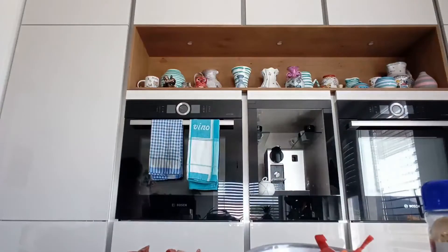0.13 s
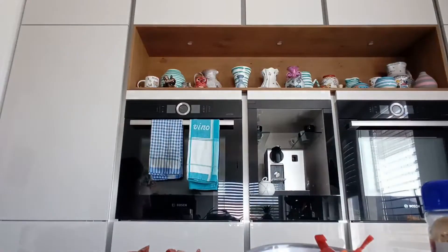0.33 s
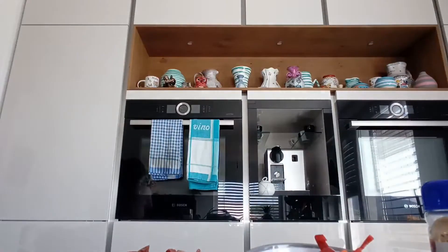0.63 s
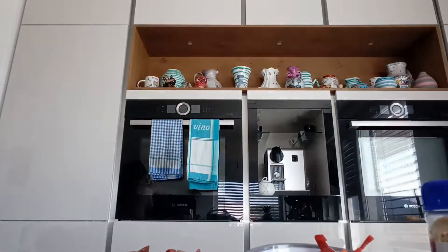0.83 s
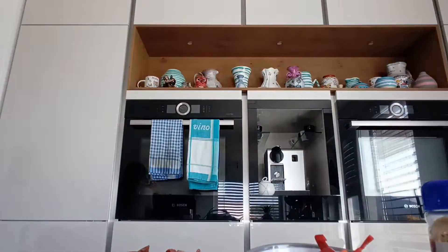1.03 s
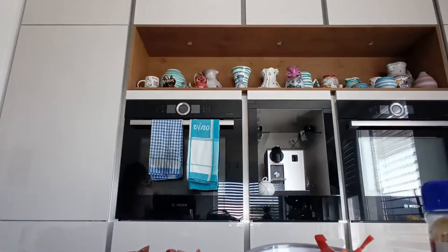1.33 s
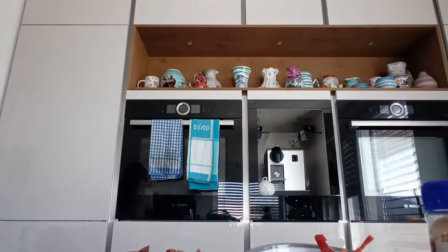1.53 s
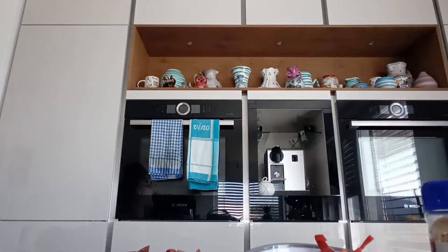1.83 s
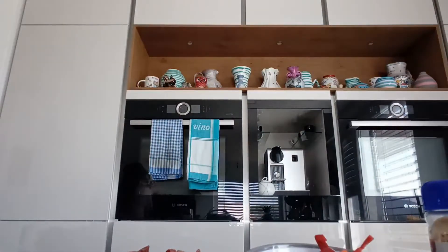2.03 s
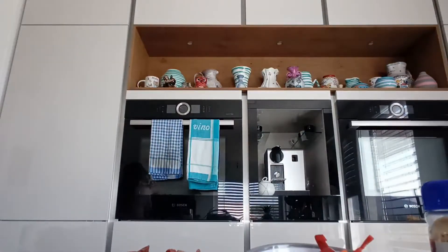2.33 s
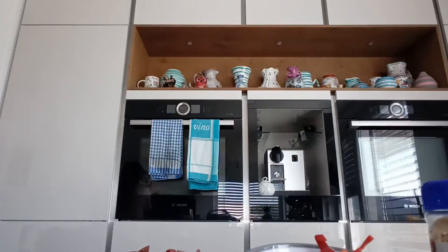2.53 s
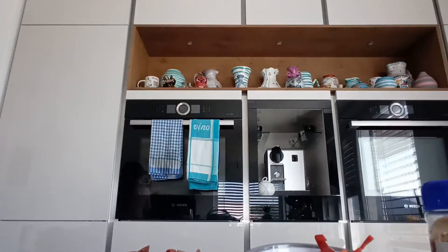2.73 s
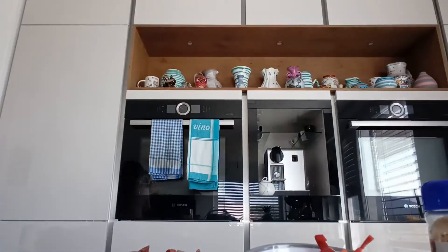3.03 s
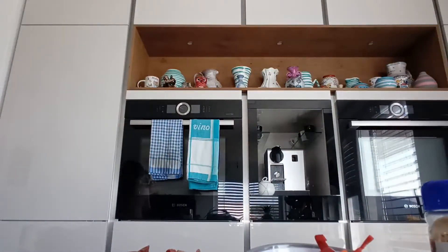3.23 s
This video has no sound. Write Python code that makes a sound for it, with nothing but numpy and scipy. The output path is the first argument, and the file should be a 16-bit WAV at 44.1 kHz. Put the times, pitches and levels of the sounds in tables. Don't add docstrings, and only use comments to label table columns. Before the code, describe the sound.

Running tap sprays into a metal basin, with splashes and low drumming from hands being washed

```python
import sys
import numpy as np
from scipy import signal
from scipy.fft import rfft, irfft, next_fast_len
from scipy.io import wavfile
from scipy.ndimage import uniform_filter1d, map_coordinates

SR = 44100
rng = np.random.default_rng(int(sys.argv[2]) if len(sys.argv) > 2 else 0)


def to_linear_factor(level_db):
    exponent = np.asarray(level_db, float) / 20
    return 10 ** exponent


def unload_wav(signal):
    wavfile.write(
        sys.argv[1],
        SR,
        np.round(np.clip(np.atleast_2d(signal).T, -1, 1) * 32767).astype(np.int16),
    )


N = 149940

# frequency in Hz, level in dB.
ROOM_COLOUR = [(20, -16), (60, -5), (100, -8), (300, -32), (900, -37)]
# start in seconds, length in seconds, pitch in Hz, level in dB.
SINGING_MODES = [(0.086, 0.14, 187, -52.5), (0.287, 0.14, 146, -51), (0.511, 0.11, 170, -46),
                 (0.824, 0.11, 402, -58), (0.895, 0.15, 194, -54.5), (0.98, 0.099, 439, -53),
                 (1.035, 0.036, 146, -44), (1.294, .27, 143, -56), (1.595, .17, 143, -57),
                 (1.883, 0.1, 140, -59.5), (1.883, 0.13, 425, -61), (1.92, 0.17, 348, -65),
                 (2.04, 0.099, 185, -57), (2.13, 0.074, 151, -61), (2.217, 0.024, 575, -53),
                 (2.222, 0.031, 345, -57), (2.216, .06, 439, -58), (2.264, 0.062, 195, -61.5),
                 (2.586, 0.023, 180, -47), (3.144, 0.075, 185, -55), (2.503, 0.14, 189, -58),
                 (2.485, .25, 425, -61), (2.825, 0.02, 165, -59), (2.834, 0.046, 345, -68),
                 (1.333, .08, 1150, -68.5), (1.504, 0.17, 1150, -71), (2.73, .06, 803, -62),
                 (3.028, .05, 350, -63), (3.045, 0.043, 185, -51), (3.148, 0.14, 345, -57.5),
                 (3.173, 0.025, 555, -53), (3.217, 0.15, 530, -64.5)]
# start in seconds, length in seconds, level in dB,
# share landing near the wall in dB.
BASIN_POURS = [(0, 0.027, -43, -5.5), (0.067, 0.27, -43, -11), (0.386, 0.077, -41.5, -13),
               (0.496, 0.12, -40.5, -8.5), (0.647, 0.085, -43, -9.5), (0.785, 0.046, -50.5, -5.5),
               (0.858, 0.17, -50, -4), (1.01, 0.093, -44, -3.5), (1.15, 0.092, -54.5, -9.5),
               (1.287, 0.19, -53.5, -40), (1.596, 0.14, -55, -16), (1.883, 0.14, -58, -2),
               (2.037, 0.14, -49.5, -6.5), (2.215, 0.028, -54.5, 8), (2.28, 0.017, -57.5, -1),
               (2.503, 0.12, -55.5, 2.5), (2.693, 0.082, -78, 7), (2.805, 0.02, -62, -15),
               (2.923, 0.038, -55.5, -20), (2.996, 0.19, -48, -7), (3.224, 0.093, -68.5, 11),
               (3.313, 0.088, -63.5, 2)]
# time in seconds, peak in dB.
BASIN_SLUGS = [(0.085, -46), (0.155, -37), (0.269, -44), (0.516, -51), (1.054, -38), (1.302, -35),
               (1.35, -30), (1.403, -30.5), (1.559, -60), (1.623, -30), (1.887, -35), (2.125, -48),
               (2.516, -53), (2.589, -33), (2.937, -47), (3.004, -61), (3.05, -46)]
# frequency in Hz, width in Hz, level in dB.
MIDDLE_MODES = [(78, 7, -13), (108, 9, -6), (133, 14, -1), (151, 11, 0), (169, 9, -3), (187, 9, -2),
                (207, 8, -8)]
# frequency in Hz, width in Hz, level in dB.
WALL_MODES = [(188, 9, -2), (207, 9, -2), (240, 34, -2), (300, 30, -3), (345, 24, -1), (402, 11, -1),
              (439, 11, 0), (520, 50, -6), (590, 40, -7), (720, 70, -13), (830, 60, -16)]
# start in seconds, level in dB, length in seconds, centre in Hz.
HAND_SPLASHES = [(0.322, -49, 0.035, 6440), (0.416, -44, 0.036, 3600), (0.472, -43, 0.061, 6260),
                 (0.488, -40, 0.046, 4030), (0.535, -40, 0.029, 4800), (0.572, -40, 0.02, 5900),
                 (1.28, -45, 0.056, 6400), (1.47, -42, 0.04, 6440), (1.68, -45, .06, 6540),
                 (0.576, -43, 0.029, 8850), (1.748, -61, 0.084, 710), (1.795, -41, 0.052, 10200),
                 (2.22, -55, 0.025, 1530), (2.602, -44, 0.048, 5130), (2.797, -48, 0.16, 2760),
                 (2.993, -43.5, 0.084, 4270)]
# frequency in Hz, level in dB.
STEEL_RINGS = [(1651, -7.5), (2060, -2.5), (2617, -39), (2690, 1), (2821, -2), (3760, -12), (4113, 6),
               (5300, 7), (5502, -13), (6390, 6), (6716, 8.5), (9679, 2.5), (10454, 2.5)]
# time in seconds, spray level in dB, fine fizz level in dB,
# level caught in the hands in dB.
STREAM_MOVES = [(0, -42.5, -0.5, -13.5), (.2, -40, 0, -13), (.4, -42.5, 1, -13.5), (.62, -41, -2, -13.5),
                (.76, -42, -3, -14), (.9, -41.5, 0.5, -20), (1.03, -42.5, -1.5, -16), (1.12, -42, 1.5, -14),
                (1.27, -41.5, 3, -18), (1.75, -42.5, 2.5, -17), (2.1, -42, -0.5, -17.5), (2.2, -44, -2, -5),
                (2.42, -43.5, -2.5, -9), (2.57, -41.5, -2.5, -12), (2.75, -43.5, -3.5, -7.5),
                (3.0, -41, 1, -16.5), (3.2, -42.5, 0, -13.5), (3.4, -42.5, -2, -12)]
# frequency in Hz, level in dB.
SPRAY_COLOUR = [(1120, -56), (1900, -14), (2490, -11), (2810, -6.5), (3460, -6), (4110, -4.5), (4700, -5.5),
                (6460, 0), (8200, -11), (10700, -87), (18000, -120)]
# frequency in Hz, level in dB.
FIZZ_COLOUR = [(4590, -6.5), (7800, -6), (9320, 2), (10500, 2), (13200, -3), (14300, -6), (14600, 0),
               (15750, -7.5)]
# frequency in Hz, level in dB.
GURGLE_COLOUR = [(450, -9.5), (640, -6), (850, -6.5), (1000, -12.5), (1150, -7), (1320, -10), (1650, -1.5),
                 (2800, -4.5)]
# frequency in Hz, width in Hz, level in dB.
CUPPED_RINGS = [(1495, 14, -4), (1651, 12, 2), (2821, 16, -3)]
# start in seconds, length in seconds,
# centre in Hz, width in Hz.
SHUT_BANDS = [(.76, .05, 300, 160), (.9, .05, 750, 280), (.92, .11, 1060, 110), (.94, .07, 1060, 90),
              (1.13, .06, 530, 160), (1.2, .08, 980, 140), (1.44, .13, 285, 80), (.94, .08, 1060, 110),
              (2.95, .12, 945, 80), (2.12, .12, 1150, 200), (2.44, .05, 500, 200), (1.46, .08, 1000, 100),
              (1.8, .24, 970, 110), (1.82, .04, 330, 260), (2.28, .1, 1000, 400), (2.42, .06, 170, 220),
              (2.5, .1, 1200, 220), (2.72, .04, 170, 200), (2.87, .05, 170, 220), (2.94, .14, 940, 140),
              (3, .1, 830, 100)]
# start in seconds, length in seconds, low edge in Hz.
SIDE_BANDS = [(.08, .07, 5400), (.7, .03, 11000), (.7, .03, 6900), (1.025, .03, 11700), (1.025, .03, 6900),
              (1.21, .03, 7600), (1.21, .03, 5100), (1.675, .03, 5100), (1.745, .05, 9600),
              (2.12, .05, 14400), (2.21, .03, 9000), (2.325, .03, 4200), (2.585, .03, 11000),
              (2.63, .05, 10700), (2.63, .05, 8300), (2.72, .05, 13800), (2.72, .05, 7900),
              (3.2, .06, 6400)]

RING_Q = 150


def unit(x):
    return x / np.sqrt(np.mean(x ** 2) + 1e-20)


def filtered(x, response):
    m = next_fast_len(N + SR // 2)
    return irfft(rfft(x, m) * response(np.fft.rfftfreq(m, 1 / SR)), m)[..., :N]


def colour(points):
    f, db = np.transpose(points)
    return lambda hz: to_linear_factor(np.interp(np.log(hz + 1), np.log(f + 1), db, -120, -120))


def modes(table):
    def response(f):
        total = 0
        for k, (centre, width, db) in enumerate(table):
            damping = 1j * f * width
            total = total + (-1) ** k * to_linear_factor(db) * damping / (centre * centre - f * f + damping)
        return total
    return response


def steel(ring_dbs):
    return modes([(hz, hz / RING_Q, db) for (hz, _), db in zip(STEEL_RINGS, ring_dbs)])


def wobble(rate):
    knots = rng.standard_normal(int(N * 40 / SR) + 4)
    return map_coordinates(knots, [np.arange(N) * min(rate, 40) / SR])


def patchy(patchy_db, wide=6, long=14, holes_db=0):
    z = signal.stft(rng.standard_normal(N), nperseg=512)[2]
    field = uniform_filter1d(rng.standard_normal(z.shape), wide, 0)
    field = unit(uniform_filter1d(field, long, 1))
    gain = to_linear_factor(patchy_db * field + holes_db * np.minimum(field, 0))
    return signal.istft(z * gain, nperseg=512)[1][:N]


def hold(start, length, attack, release):
    corners = [start - attack, start, start + length, start + length + release]
    return np.interp(np.arange(N) / SR, corners, [0, 1, 1, 0])


def drops(count, centre_hz, spread, cycles, size_db):
    draw, t = rng.random((count, 2)), np.arange(160) / SR
    hz = np.clip(centre_hz * np.exp(spread * rng.standard_normal((count, 1))), 900, 15000)
    size = to_linear_factor(-size_db * np.log(draw[:, :1] + 1 / 20))
    rise = 1 + 0.06 * hz * t / cycles
    ring = size * np.sin(2 * np.pi * hz * t * rise) * np.exp(-hz * t / cycles)
    where = (draw[:, 1:] * N).astype(int) + np.arange(160)
    return unit(np.bincount(where.ravel(), ring.ravel(), N + 160)[:N])


def room_tone():
    return to_linear_factor(-79) * unit(filtered(rng.standard_normal(N), colour(ROOM_COLOUR)))


def kitchen(x):
    t60_s, delay = 0.2, 150
    tail = rng.standard_normal(SR // 4) * to_linear_factor(-60 * np.arange(SR // 4) / SR / t60_s)
    return signal.fftconvolve(np.pad(x, (delay, 0)), tail / np.linalg.norm(tail))[:N]


def singing():
    flutter_db = 4 * (wobble(40) - .5)
    drift = 1 + .028 * wobble(35)
    shifts = rng.integers(0, N, len(SINGING_MODES))
    out = np.zeros(N)
    for (start, length, hz, db), shift in zip(SINGING_MODES, shifts):
        phase = 2 * np.pi * hz * np.cumsum(np.roll(drift, shift)) / SR
        level = to_linear_factor(db + np.roll(flutter_db, shift)) * hold(start, length, .01, .025)
        out += level * np.sqrt(2) * np.sin(phase)
    return out


def struck(force, table, slug_db, slug_s, top_hz):
    response = modes(table)
    noise_gain = np.sqrt(np.mean(np.abs(response(np.linspace(0, SR / 2, 8192))) ** 2))
    push = force * to_linear_factor(2 * wobble(39) - 2.5) * rng.standard_normal(N) / noise_gain
    t = np.arange(N) / SR
    for when, db in BASIN_SLUGS:
        push = push + to_linear_factor(db + slug_db) * np.exp(-((t - when) / slug_s) ** 2)
    return filtered(push, lambda f: response(f) / (1 + (f / top_hz) ** 6))


def basin():
    middle, wall = np.full(N, to_linear_factor(-72.5)), np.full(N, to_linear_factor(-72.5))
    for start, length, db, wall_db in BASIN_POURS:
        pour = to_linear_factor(db - 0.5) * hold(start, length, 0.015, 0.054)
        middle = middle + pour
        wall = wall + to_linear_factor(wall_db) * pour
    low = struck(middle, MIDDLE_MODES, slug_db=0.5, slug_s=0.0019, top_hz=230)
    high = struck(wall, WALL_MODES, slug_db=-11.5, slug_s=0.16 * 0.0019, top_hz=1000)
    return filtered(low + high, lambda f: 1 / (1 + (120 / (f + 1)) ** 4))


def splashes():
    wall = steel([6] * len(STEEL_RINGS))
    spray = filtered(rng.standard_normal(N), lambda f: 1 + wall(f))
    out = np.zeros(N)
    for start, db, length, hz in HAND_SPLASHES:
        stretch = np.roll(spray, rng.integers(N))
        burst = unit(filtered(stretch, modes([(hz, 0.3 * hz, 0)])))
        out += to_linear_factor(db) * hold(start, 0.59 * length, 0.011, length) * burst
    return out


def aerated_spray():
    bubbles = drops(count=9000, centre_hz=6000, spread=.7, cycles=3, size_db=3)
    bright = unit(filtered(bubbles, lambda f: 1j * f ** .5))
    return patchy(patchy_db=1.2, wide=1, long=10) + to_linear_factor(-7) * bright


def cupped_hands():
    bubbles = drops(count=900, centre_hz=1530, spread=0.38, cycles=4.4, size_db=5.0)
    churn = patchy(patchy_db=3, wide=1, long=20, holes_db=3.5) + 0.1 * bubbles
    gurgle = unit(filtered(churn, colour(GURGLE_COLOUR)))
    return gurgle + to_linear_factor(-7.5) * unit(filtered(churn, modes(CUPPED_RINGS)))


def stream():
    when, *columns = np.transpose(STREAM_MOVES)
    level_db, fizz_db, caught_db = [np.interp(np.arange(N) / SR, when, c) for c in columns]
    level_db = level_db + .5 * wobble(13.0) + 0.45 * wobble(25.68)
    body = unit(filtered(aerated_spray(), colour(SPRAY_COLOUR)))
    ringing = filtered(patchy(patchy_db=1.5, long=6), steel([db for _, db in STEEL_RINGS]))
    body = body + to_linear_factor(-6) * unit(ringing)
    fizz = to_linear_factor(fizz_db + 0.51 * wobble(5.97)) * unit(filtered(aerated_spray(), colour(FIZZ_COLOUR)))
    hands = to_linear_factor(caught_db - 1.5 + 0.76 * wobble(7.76)) * cupped_hands()
    return to_linear_factor(level_db) * (to_linear_factor(0.14) * body + fizz + hands)


def scene():
    water = stream() + splashes()
    mono = room_tone() + to_linear_factor(-17) * kitchen(water) + singing() + basin() + water
    return np.array([mono, mono])


def suppress(x):
    quiet_db, squeeze, deepest_db, shut_db = -88, 2.2, -22, -12
    hz, t, z = signal.stft(x, SR, nperseg=2048, noverlap=1536)
    power = uniform_filter1d(uniform_filter1d(np.abs(z) ** 2, 3, 0), 6, 1)
    level_db = 10 * np.log10(np.abs(power) + 1e-14)
    cut_db = np.clip(squeeze * (level_db - quiet_db), deepest_db, 0)
    for start, length, centre, width in SHUT_BANDS:
        in_band = np.abs(hz - centre) < width / 2
        cut_db = cut_db + shut_db * np.outer(in_band, (t > start) & (t < start + length))
    return signal.istft(z * to_linear_factor(cut_db), nperseg=2048, noverlap=1536)[1][:N]


def side_noise(mono):
    late = np.roll(mono, 3000)
    side = np.zeros(N)
    for start, length, low_hz in SIDE_BANDS:
        band = filtered(late, lambda f: (f > low_hz) & (f < low_hz + 1400))
        side += hold(start + .012, length - .024, .011, .011) * band
    return to_linear_factor(-4) * np.array([side, -side])


def band_limit(x):
    return signal.sosfilt(signal.butter(12, 16520, fs=SR, output="sos"), x)


def record(dry):
    top_hz = 15760
    dry = filtered(dry, lambda f: np.clip((top_hz - f) / 30, 0, 1))
    mono = suppress(dry[0])
    mix = np.array([mono, mono]) + side_noise(mono)
    return band_limit(mix)


dry = scene()
out = record(dry)
unload_wav(out)
```